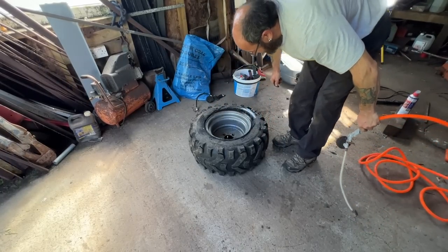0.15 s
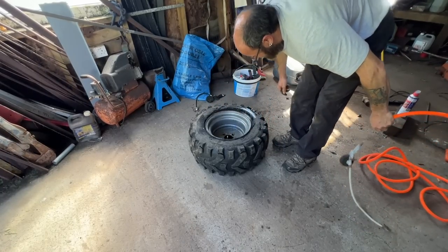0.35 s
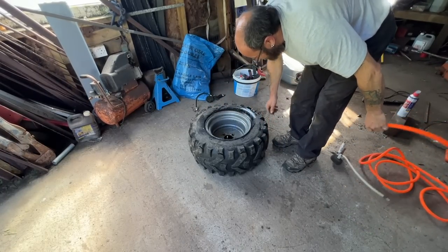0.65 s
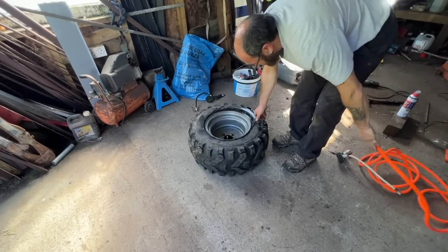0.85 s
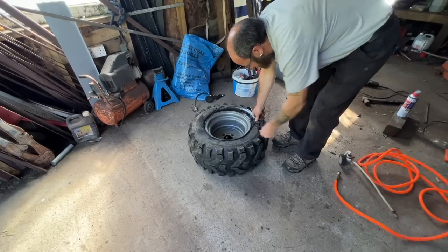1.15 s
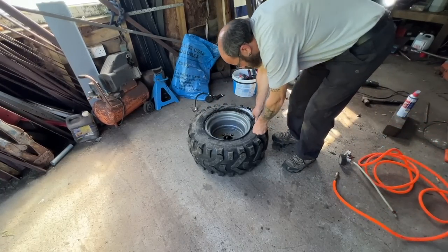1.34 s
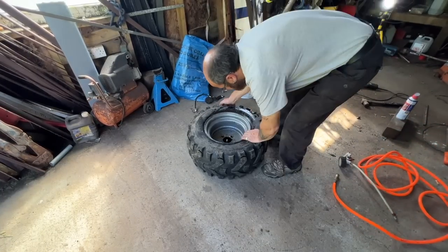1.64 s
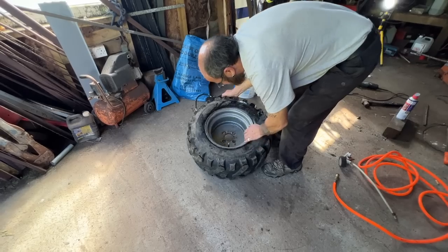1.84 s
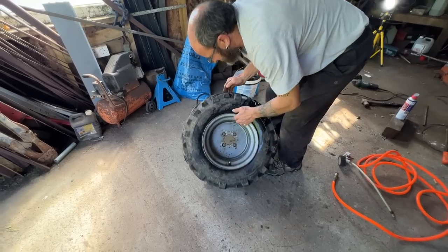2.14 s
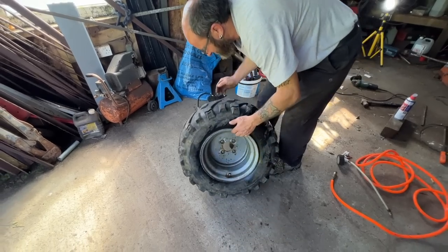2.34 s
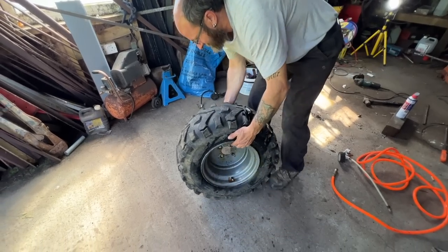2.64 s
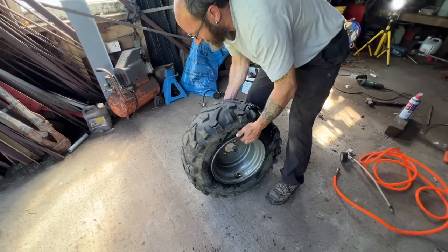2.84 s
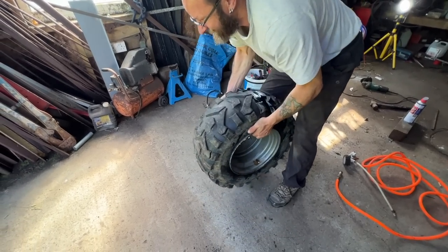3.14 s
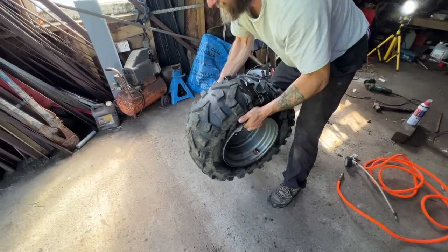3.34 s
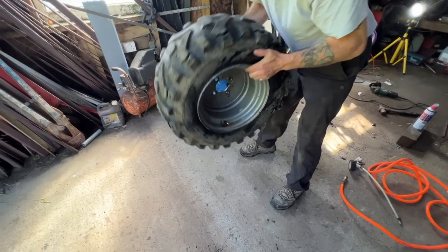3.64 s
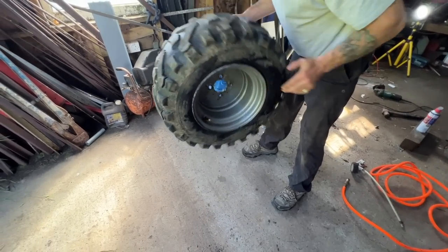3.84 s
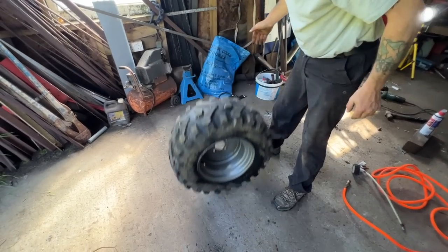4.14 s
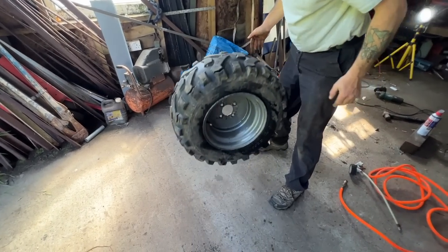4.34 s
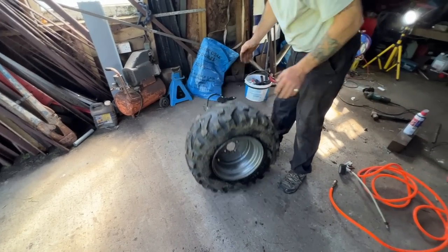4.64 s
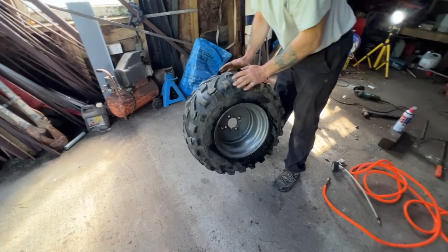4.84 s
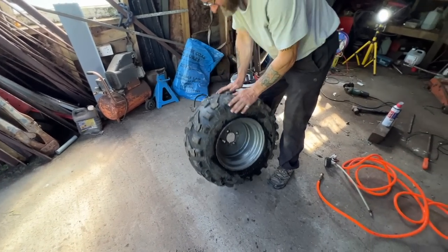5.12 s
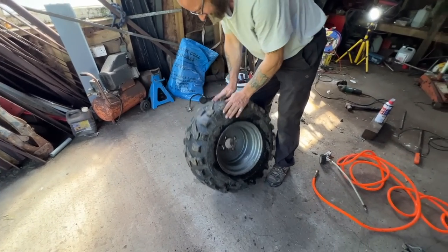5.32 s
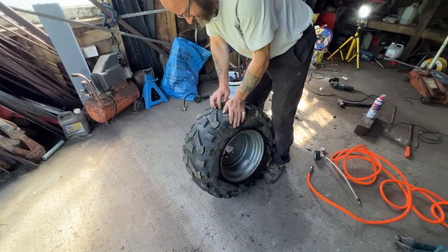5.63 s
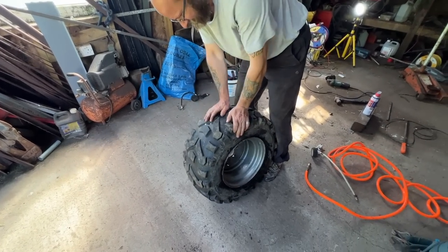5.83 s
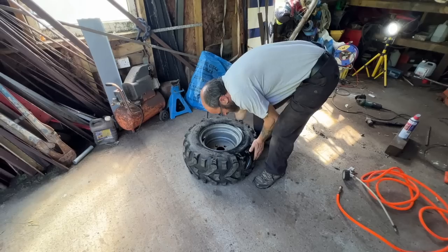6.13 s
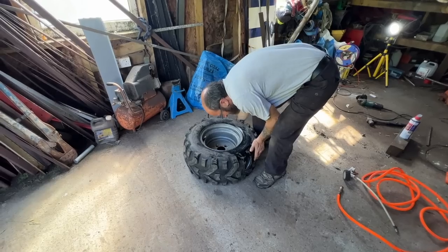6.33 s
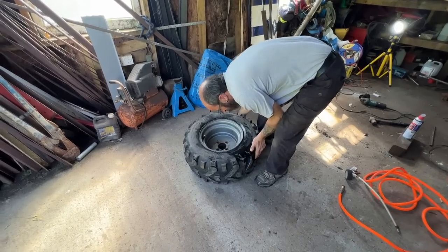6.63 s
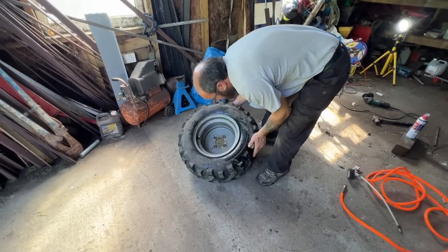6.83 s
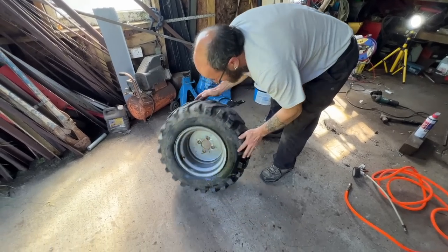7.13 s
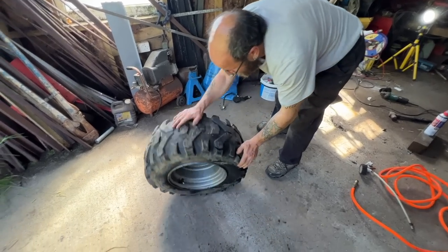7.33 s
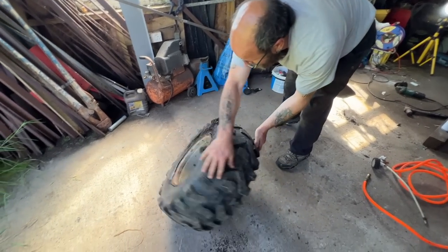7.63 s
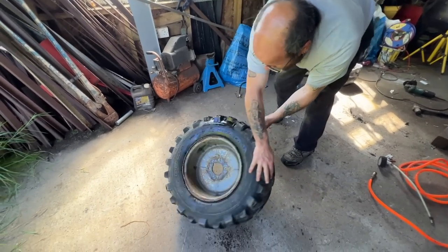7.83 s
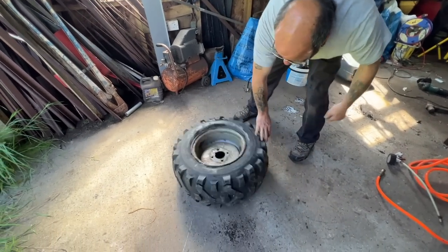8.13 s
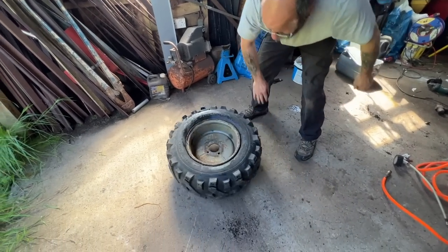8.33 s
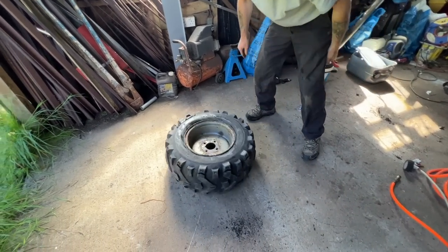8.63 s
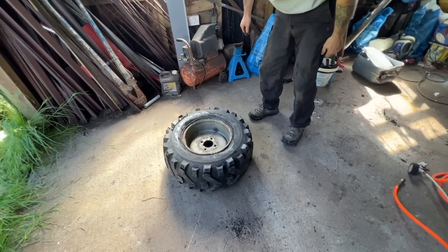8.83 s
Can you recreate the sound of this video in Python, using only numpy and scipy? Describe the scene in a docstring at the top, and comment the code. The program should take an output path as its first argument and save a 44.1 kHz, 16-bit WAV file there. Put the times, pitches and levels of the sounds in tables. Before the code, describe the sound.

Over a running compressor, a brief air hiss and metal clinks are followed by two runs of a tyre thumping on a concrete floor.

```python
"""Air hisses from an inflator chuck over the chug of a belt-driven piston compressor in a garage. The
compressor's valves hiss on every turn. At about 6.1 s the scene changes and the compressor is heard from
another spot, with a different balance of harmonics. The leak stops as the chuck and its hose drop on concrete,
close by and mostly louder on the left; then a tyre on a steel rim is lifted, bounced and tipped over. The
microphone has two ports; its gain control ducks the whole scene after each loud blow."""
import sys
import numpy as np
from scipy import signal
from scipy.io import wavfile
from scipy.ndimage import uniform_filter1d

SR = 44100
rng = np.random.default_rng(int(sys.argv[2]) if len(sys.argv) > 2 else 0)


def persist_wave(psi):
    """Save psi, clipped to +-1, as 16-bit WAV."""
    counts = np.round(np.clip(psi, -1, 1) * 32767).astype(np.int16)
    wavfile.write(sys.argv[1], SR, np.atleast_2d(counts).T)


N = 395566
T = np.arange(N) / SR

# Crank speed, sagging as the tank fills: t/s, speed/(turns/s)
CRANK_SPEED = [(0, 18.436), (1.6, 18.428), (4.5, 18.422), (6.1, 18.405), (9, 18.405)]
# Crank harmonics: order, left/dB, right/dB before 6.1 s, left/dB, right/dB after
CRANK_ORDERS = [(2, -51, -51, -52, -54), (3, -51, -50, -54, -53), (4, -35, -34, -36, -36),
                (5, -48, -52, -49, -49), (6, -33, -38, -34, -42), (7, -47, -45, -57, -48),
                (8, -25, -24, -25, -24), (9, -57, -63, -57, -61), (10, -47, -42, -48, -45),
                (11, -40, -38, -40, -40), (12, -45, -45, -52, -47), (13, -67, -57, -73, -65),
                (14, -44, -37, -42, -36), (15, -55, -70, -70, -72), (16, -41, -43, -43, -51),
                (17, -54, -58, -58, -56), (18, -49, -40, -49, -41), (19, -55, -54, -56, -50),
                (20, -45, -37, -48, -39), (21, -55, -66, -58, -50), (22, -43, -47, -49, -50),
                (23, -67, -46, -58, -51), (24, -47, -35, -43, -41), (25, -39, -38, -40, -41),
                (26, -45, -45, -46, -45), (27, -44, -39, -51, -39), (28, -43, -40, -44, -40),
                (29, -40, -40, -43, -42), (30, -47, -45, -44, -45), (31, -40, -40, -42, -38),
                (32, -45, -44, -42, -51), (33, -46, -55, -48, -65), (34, -48, -37, -50, -41),
                (35, -45, -54, -60, -68), (36, -49, -44, -46, -43), (37, -44, -32, -42, -31),
                (38, -50, -47, -40, -46), (39, -36, -34, -38, -37), (40, -36, -37, -37, -34),
                (41, -50, -39, -43, -46), (42, -46, -39, -48, -40), (43, -44, -46, -45, -44),
                (44, -47, -42, -56, -43), (45, -48, -46, -42, -36), (46, -41, -44, -46, -41),
                (47, -51, -51, -49, -51), (48, -51, -48, -47, -39), (49, -48, -45, -42, -41),
                (50, -50, -52, -49, -58), (51, -47, -42, -49, -45), (52, -45, -45, -46, -61),
                (53, -40, -43, -42, -40), (54, -46, -52, -47, -59), (55, -60, -54, -55, -50),
                (56, -55, -70, -60, -54), (57, -51, -56, -50, -59), (58, -56, -70, -53, -63),
                (59, -59, -54, -57, -72), (60, -63, -62, -58, -54), (61, -60, -54, -54, -61),
                (62, -55, -54, -48, -45), (63, -60, -67, -71, -61), (64, -54, -62, -68, -71),
                (65, -57, -51, -56, -52), (66, -55, -54, -54, -53), (67, -65, -51, -47, -47),
                (68, -68, -66, -53, -55), (69, -46, -44, -47, -51), (70, -58, -60, -51, -59),
                (71, -51, -54, -54, -56), (72, -60, -71, -56, -57), (73, -70, -57, -50, -50),
                (74, -62, -61, -63, -70), (75, -50, -44, -41, -47), (76, -55, -54, -64, -55),
                (77, -49, -56, -53, -64), (78, -60, -68, -68, -54), (79, -49, -66, -41, -51),
                (80, -56, -57, -55, -56), (81, -56, -60, -58, -52), (82, -54, -52, -58, -60),
                (83, -46, -68, -52, -68), (84, -61, -53, -62, -65), (85, -60, -57, -66, -63),
                (86, -60, -64, -66, -67), (87, -46, -58, -52, -50), (88, -52, -70, -66, -61),
                (89, -56, -58, -62, -55), (90, -54, -57, -58, -61), (91, -57, -56, -58, -57),
                (92, -59, -64, -62, -60), (93, -59, -58, -58, -54), (94, -56, -63, -60, -73),
                (95, -57, -51, -68, -65), (96, -57, -62, -64, -66)]
# How distinctly the valves knock: t/s, phase scatter removed/rad
KNOCK_CLARITY = [(0, 1.2), (1.5, 1.6), (3.9, 1.6), (4.3, .8), (5.9, .8), (6.2, 2.3), (7.4, 2.2), (8, 1),
                 (9, 1)]
# Thin whine, the crank's 107th harmonic: t/s, level/dB
CRANK_WHINE = [(0, -54), (.4, -46), (1.8, -47), (2.4, -51), (2.8, -56), (3.1, -50), (3.8, -50), (4, -62)]
# Motor shaft tones, beating with the crank: f/Hz, level/dB
MOTOR_TONES = [(80.5, -47), (99.7, -44), (136.5, -33.5), (154.9, -36), (170.8, -43), (173.4, -59)]
# Rattle between the orders: f/Hz, relative density/dB
RATTLE_SPECTRUM = [(15, -45), (25, -29), (60, -25), (100, 9), (150, -8), (220, -2.5), (320, -10), (480, -9),
                   (720, -6.5), (950, -10.5), (1060, -14.5), (1150, -10.5), (1400, -10.5), (1700, -13.5),
                   (2000, -19), (2600, -23), (4000, -85)]
# Valve hiss up to about 10 kHz; above it the noise is faint and uneven: f/Hz, relative density/dB
HISS_SPECTRUM = [(1060, 5.5), (1800, -1), (1950, 7), (2100, -1), (2300, 2.5), (3200, -7.5), (3470, -9.5),
                 (7440, -9.5), (8610, -3), (9100, -6.5), (9600, -9), (10000, -36), (11300, -18),
                 (12500, -102), (16200, -67.5), (22000, -120)]
# Valve plate resonances: f/Hz, width/Hz, level/dB
VALVE_WHISTLES = [(7950, 240, -58), (8250, 300, -57), (8530, 220, -50), (8880, 150, -57)]
# Swell of the compressor at the microphone: t/s, pump gain/dB, valve gain/dB
COMPRESSOR_GAINS = [(0, -1.5, 6.5), (.5, -3.5, 2), (1.002, -3.5, 2.5), (1.55, -2, 2), (1.68, -0.5, 2),
                    (2.5, -1, 3), (4, -1, 3.5), (5, 1.5, 3), (5.5, -2.5, 1.5), (6.05, -0.5, 2.5),
                    (6.15, 0.5, 2.5), (7.6, 0, 2.5), (8.2, 1, 7), (8.6, 2.5, 4.5), (9, 0.5, 5.5)]
# Tyre landings: t/s, level/dB, brightest f/Hz, spread/octaves, floor boom/dB, slap/dB,
# slap top f/Hz, rise/s, contact/s
TYRE_LANDINGS = [(4.094, 3, 453, 0.95, -10.5, -13.5, 1350, .005, 0.03),
                 (4.124, -3, 386, 1.34, -25, -17, 1300, .01, 0.022),
                 (4.6295, 4, 520, 1.28, -3.5, -17.5, 2050, 0.0004, 0.04),
                 (4.69, -23, 332, 1.5, -13.5, -32, 1900, .01, 0.032),
                 (5.04, 2.5, 427, 0.61, -14.5, -13, 1380, .001, 0.019),
                 (5.34, -10, 341, 1.17, -22.5, -24, 1390, 0.0018, 0.025),
                 (5.559, -19, 410, 0.65, -29, -47, 1410, .008, 0.017),
                 (5.716, -19, 415, 0.87, -33, -51, 1400, .008, 0.026),
                 (8.105, -3.5, 225, 1.04, -8.5, -18, 1210, .03, 0.062),
                 (8.39, -9, 278, 1, -26, -33, 1600, 0.011, 0.033),
                 (8.413, -9, 302, 1.2, -34, -12, 1300, .003, 0.013),
                 (8.433, 3.5, 215, 0.8, -20, -7.5, 1160, .015, 0.018),
                 (8.51, -15, 268, 0.7, -30, -39, 1800, .01, 0.026),
                 (8.654, 2.5, 215, 0.66, -18, -15.5, 1860, 0.004, 0.0095),
                 (8.8, -6.5, 523, 0.28, -49, -17, 1620, .002, 0.0068),
                 (8.809, 2.5, 196, .6, -15, -20, 1610, 0.004, 0.008),
                 (8.924, -6.5, 200, 0.89, -11.5, -22.5, 1600, 0.0049, 0.023)]
# Modes of the tyre on its rim: f/Hz, level/dB, t60/s
TYRE_MODES = [(100, -2, .2), (205, 1, .1), (245, -1, .16), (278, -3, .12), (330, -7, .08), (383, 1, .13),
              (456, 1, .11), (580, 0, .08), (670, -1, .06), (824, 0, .05), (970, 0, .05), (1180, -2, .04),
              (1380, -3, .04)]
# Chuck and gauge hitting the floor: t/s, level/dB, thud/dB, left minus right/dB, brightest f/Hz,
# relative ring/dB, rise/s, contact/s
CHUCK_HITS = [(0.277, -6, -5.5, 0, 2530, -10, .009, 0.013),
              (.419, -20.5, -13, 5, 1930, -3.5, 0.0055, 0.019),
              (0.5076, -24.5, -24, 0, 2080, -5, 0.0028, 0.012),
              (0.7655, -12, -34, 0, 2460, -16, .0005, .005), (.7745, -21, -31, 3, 2090, -8, .002, 0.012),
              (0.9802, -17.5, -28, 8, 7260, -4, 0.00088, 0.0032),
              (.989, -22, -45, 7, 7800, -1, 0.00055, 0.0035), (.998, -20, -43, 6, 8300, -7, .0005, .006),
              (1.0844, -5.5, -39, 9, 9300, -14, 0.000354, 0.0032),
              (1.094, -17, -45, 5, 7500, -18, .0008, .003), (1.098, -14, -42, 3, 7760, -12, 0.00056, 0.015),
              (1.392, -34, -49, 2, 8500, -8, 0.0011, .012)]
# Modes of the metal fittings: f/Hz, level/dB, t60/s
FITTING_MODES = [(1500, -6, .06), (1775, -9, .05), (1980, -1, .16), (2277, 0, .12), (2500, -5, .06),
                 (2950, -3, .06), (3515, -3, .045), (3811, 0, .06), (4350, -2, .045), (4800, -2, .045),
                 (5800, -6, .03), (6550, -6, .03), (7364, -2, .03), (8220, -1, .04), (8667, 0, .04)]
# Jet from the chuck: f/Hz, relative density/dB
JET_SPECTRUM = [(700, -33), (1300, 13.5), (2400, 0), (5000, -0.5), (8600, 0), (11500, -3.5), (16000, -6.5)]
# Drags on concrete, mostly rubber and hose; the short one at 3.19 s is a light metal clink: t/s, length/s,
# level/dB, resonance f/Hz
DRAGS = [(2.619, 0.057, -42, 3130), (3.19, 0.031, -36.5, 5940), (3.24, 0.05, -41.5, 3600),
         (4.468, 0.12, -30.5, 2230), (8.316, 0.025, -32.5, 2880), (8.847, 0.029, -29, 5100)]
# Decay of the garage: f/Hz, t60/s
GARAGE_DECAY = [(100, 0.29), (250, 0.22), (500, 0.13), (1500, 0.24), (5000, 0.25), (12000, 0.19)]
# Likeness of the two microphone ports, their lag aside: f/Hz, coherence (0 to 1)
PORT_COHERENCE = [(60, .97), (150, .97), (300, .65), (700, .45), (1500, .5), (4000, .45), (9000, .55),
                  (13000, .8)]
# Balance of noise between the ports: f/Hz, left minus right/dB
PORT_BALANCE = [(60, -2), (130, 4), (290, -4), (640, -0.5), (1410, 0.5), (3100, 1.5), (6820, 15),
                (15000, -18.5)]

LEFT_LAG_S, TOP_HZ = 0.0002503, 16100  # delay to the left port; upper band edge
TONE_CHANGE_S = 6.04, 6.12  # a short crossfade as the scene changes at about 6.1 s


def compressor():
    """The running machine: crank, motor and rattle below, hissing and whistling valves above."""
    turns = np.cumsum(np.interp(T, *np.transpose(CRANK_SPEED))) / SR
    turns -= turns[round(6.4295 * SR)]  # count from one valve knock
    tones = crank(turns) + hum_and_whine(turns)
    whistle = valve_whistle(turns)
    pump = tones + amp(-32) * port_noise(RATTLE_SPECTRUM, patchy_db=1.5)
    valves = whistle + amp(-38) * port_noise(HISS_SPECTRUM, patchy_db=2)
    times, pump_db, valve_db = np.transpose(COMPRESSOR_GAINS)
    return amp(np.interp(T, times, pump_db)) * pump + amp(np.interp(T, times, valve_db)) * valves


def crank(turns):
    """The piston sounds harmonics of the crank speed; those near 700 Hz line up into the valve knock."""
    step, out = 8, 0  # all under 2 kHz, so an eighth of the rate will do
    t, knots = T[::step], np.arange(0, 10, .35)
    changed = np.interp(t, TONE_CHANGE_S, (0, 1))
    clarity = np.interp(t, *np.transpose(KNOCK_CLARITY))
    for (order, *levels_db), lag in zip(CRANK_ORDERS, crank_lags()):
        before_db, after_db = np.reshape(levels_db, (2, 2, 1))
        knock = np.exp(-((order - 40) / 8) ** 4)
        scatter = (np.pi - clarity * knock) * rng.uniform(-1.033, 1)
        phase = 2 * np.pi * order * turns[::step] + scatter + np.array([[-lag / 2], [lag / 2]])
        waver = np.array([np.interp(t, knots, port) for port in rng.standard_normal((len(knots), 2)).T])
        depth_db = np.clip(order / 20, .5, 1.6)  # people moving about shift the short waves most
        knock_shift = np.exp(-2j * np.pi * order * .19)  # before 6.1 s the knock falls .19 turn later
        at_mic = (1 - changed) * amp(before_db) * knock_shift + changed * amp(after_db)
        out += np.sqrt(2) * amp(depth_db * waver) * (at_mic * np.exp(1j * phase)).real
    return signal.resample_poly(out, step, 1, axis=1)[:, :N]


def crank_lags():
    """Left-port lag per order in radians: echoes scatter it above 240 Hz, less so for strong orders."""
    rows = np.array(CRANK_ORDERS, float)
    order, loudest_db = rows[:, 0], rows[:, 1:].max(1)
    hz = order * CRANK_SPEED[0][1]
    direct = np.clip((loudest_db + order / 8 + 43) / 14, 0, .7)
    scatter = (1 - direct) * 1.33 / (1 + (240 / hz) ** 4)
    return 2 * np.pi * hz * LEFT_LAG_S + scatter * rng.standard_normal(len(hz))


def hum_and_whine(turns, whine_hz=1971):
    """The motor shaft's hum and the crank's thin whine, both sagging with the crank speed."""
    shaft_s = turns / 18.42  # time as the slowing shaft counts it
    hum = sum(amp(db) * np.cos(2 * np.pi * (hz * shaft_s + rng.random())) for hz, db in MOTOR_TONES)
    whine = amp(np.interp(T, *np.transpose(CRANK_WHINE))) * np.cos(2 * np.pi * whine_hz * shaft_s)
    return np.sqrt(2) * (hum + whine)


def valve_whistle(turns, repeating=.75):
    """Air rings the valve plates and puffs once a turn; part of the clatter repeats on every turn."""
    puff_turn = .52 + .1 * np.interp(T, TONE_CHANGE_S, (1, 0))
    puff = 1 + .45 * np.exp(2.5 * (np.cos(2 * np.pi * (turns - puff_turn)) - 1))
    one_turn = signal.resample(rng.standard_normal((2, 2400)), 19200, axis=1)
    clatter = one_turn[:, (turns % 1 * one_turn.shape[1]).astype(int)]
    air = repeating * clatter + np.sqrt(1 - repeating ** 2) * rng.standard_normal((2, N))
    return puff * sum(amp(db) * unit_rms(band(air, hz - width / 2, hz + width / 2, order=2))
                      for hz, width, db in VALVE_WHISTLES)


def tyre_bounces():
    """Each landing rings the tyre; the carcass shudders, the tread slaps and the floor booms."""
    out = np.zeros(N)
    for start, db, hz, octaves, boom_db, slap_db, top_hz, rise, contact in TYRE_LANDINGS:
        modes = [(f, level - 10 * (np.log2(f / hz) / octaves) ** 2, t60) for f, level, t60 in TYRE_MODES]
        # soft rubber: the lower the thump, the longer the blow; a slow landing softens it
        force = chatter(rise, contact, blow=36.5 * np.exp(-rise / .022), blow_s=.12 / hz)
        shudder = band(chatter(rise, .94 * contact), hz / 2 ** (.8 * octaves), hz * 2 ** (1.05 * octaves))
        tread_force = chatter(rise, 1.45 * contact, blow=26 * np.exp(-rise / .0072))
        slap = band(tread_force, 450, top_hz) + .2 * band(chatter(rise, contact), top_hz, 7400)
        add(out, start - rise, amp(db) * (.61 * ring(modes, force) + .48 * shudder) + amp(slap_db) * slap)
        add(out, start, amp(boom_db) * floor_boom(len(force)))
    return out


def chuck_clinks():
    """Fittings ring over a bright crack and the gauge's thud; a glancing hit has no sharp edge."""
    out = np.zeros((2, N))
    for start, db, thud_db, side_db, hz, ring_db, rise, contact in CHUCK_HITS:
        force = chatter(rise, contact, blow=32.5 * np.exp(-rise / .002), blow_s=.00005)
        modes = [(f * (1 + .015 * rng.standard_normal()),
                  level - 20 * np.log2(f / hz) ** 2 + 2.5 * rng.standard_normal(), t60)
                 for f, level, t60 in FITTING_MODES]
        crack = 1.06 * band(force, hz / 2.73, 7200) + .82 * band(force, hz / 1.71, hz * 1.28)
        metal = amp(ring_db) * ring(modes, force) + crack + amp(-11) * band(force, 9100, TOP_HZ)
        gauge_force = chatter(rise + .006, contact=.024, blow=19, blow_s=.00072)
        thud = band(gauge_force, 107, 470) + amp(-10) * floor_boom(len(force))
        pan = amp(side_db * np.array([[.5], [-.5]]))
        add(out, start - rise, (amp(db) * metal + amp(thud_db) * thud) * pan)
    return out


def chuck_leak(stop_s=.418):
    """A broad air jet spurts, settles and cuts off when the chuck lands."""
    t, out = T[:SR // 2], np.zeros((2, N))
    level_db = -32.5 + 12 * np.exp(-t / .047)
    add(out, 0, amp(level_db) * (t < stop_s) * port_noise(JET_SPECTRUM, patchy_db=0, size=len(t)))
    return out


def floor_scuffs():
    """Drags and scrapes on concrete: grit through a resonance over a broad scrape, loudest mid-event."""
    out = np.zeros(N)
    for start, length, db, hz in DRAGS:
        t = np.arange(0, length, 1 / SR)
        grit = rng.standard_normal(len(t)) * amp(3.3 * rng.standard_normal(len(t)))
        rub = unit_rms(resonate(resonate(grit, hz, .4 * hz), hz, .4 * hz))
        scrape = unit_rms(band(band(grit, 830, 6000), 500, 7000))
        fade_db = -20 * abs(np.interp(t / length, (0, .49, 1), (-1, 0, 1))) ** 1.12
        add(out, start, amp(db + fade_db) * (rub + .3 * scrape))
    return out


def floor_boom(size):
    """The floor slab heaves under a blow at two low pitches."""
    t = np.arange(size) / SR
    slab = np.sin(2 * np.pi * 92 * t) + .11 * np.sin(2 * np.pi * 36 * t)
    return slab * (t / .034) * np.exp(1 - t / .019)


def garage_echoes(x):
    """Sparse echoes, each band dying at its own speed; long waves reach both ports alike."""
    taps = np.zeros((2, SR // 2))
    arrivals = np.arange(300, SR // 2 - 20, 20) + rng.integers(0, 20, (2, (SR // 2 - 301) // 20))
    np.put_along_axis(taps, arrivals, rng.choice([-1., 1.], arrivals.shape), 1)
    hz, t, (apart, right) = signal.stft(taps, SR, nperseg=512)
    spectra = np.array([cohere(right, apart, hz), right]) * amp(-60 * t / lookup(GARAGE_DECAY, hz))
    tail = signal.istft(spectra, SR, nperseg=512)[1]
    return signal.fftconvolve(x[None], tail / np.linalg.norm(tail[0]), axes=1)[:, :N]


def port_noise(spectrum, patchy_db, size=N):
    """Coloured noise with drifting patches, as the two ports hear it, at rms 1."""
    frames, hz = size // 256 + 5, np.fft.rfftfreq(1024, 1 / SR)
    right_re, right_im, apart_re, apart_im, patches = rng.standard_normal((frames, 513, 5)).T
    patches = unit_rms(uniform_filter1d(uniform_filter1d(patches, 9, 0), 12, 1))
    right = right_re + 1j * right_im
    left = cohere(right, apart_re + 1j * apart_im, hz) * np.exp(-2j * np.pi * hz * LEFT_LAG_S)[:, None]
    pan = amp(lookup(PORT_BALANCE, hz) / 2)
    spectra = np.array([left * pan, right / pan]) * amp(lookup(spectrum, hz) + patchy_db * patches)
    return unit_rms(signal.istft(spectra, nperseg=1024, noverlap=768)[1][:, :size])


def cohere(right, apart, hz):
    """The left port's spectrum: partly the right port's, partly independent."""
    coherence = lookup(PORT_COHERENCE, hz)
    return coherence * right + np.sqrt(1 - coherence ** 2) * apart


def chatter(rise, contact, blow=0., blow_s=.0001):
    """Rough contact force: noise swells for rise and dies over contact seconds, a blow at its peak."""
    t = np.arange(round(.25 * SR)) / SR
    since_peak = np.maximum(t - rise, 0)
    rough = np.minimum(t / rise, 1) ** 2 * np.exp(-since_peak / contact) * rng.standard_normal(len(t))
    age = since_peak / blow_s
    return rough + blow / (blow_s * SR) * age * np.exp(-age)


def ring(modes, force):
    """A force rings a set of damped modes, at peak 1."""
    t = np.arange(round(.3 * SR)) / SR
    body = sum(amp(db - 60 * t / t60) * np.sin(2 * np.pi * hz * t) for hz, db, t60 in modes)
    out = signal.fftconvolve(force, body)
    return out[:len(force)] / abs(out).max()


def resonate(x, hz, width_hz):
    """One resonance: shifts hz down to zero, smooths, and shifts back."""
    carrier = np.exp(2j * np.pi * hz * np.arange(len(x)) / SR)
    pole = np.exp(-np.pi * width_hz / SR)
    return 2 * (carrier * signal.lfilter([1 - pole], [1, -pole], x / carrier)).real


def band(x, low_hz, high_hz, order=3):
    """Band-pass scaled to peak 1."""
    out = signal.sosfilt(signal.butter(order, [low_hz, high_hz], "bandpass", fs=SR, output="sos"), x)
    return out / abs(out).max()


def lookup(table, hz):
    """A table's values on a log-frequency axis, as a column."""
    f, value = np.transpose(table)
    return np.interp(np.log(hz + 1), np.log(f + 1), value)[:, None]


def add(mix, start_s, sound):
    """Mixes a sound in at a time."""
    part = mix[..., round(start_s * SR):][..., :sound.shape[-1]]
    part += sound[..., :part.shape[-1]]


def amp(db):
    """Gain of a level in dB."""
    return 10 ** (np.asarray(db) / 20)


def unit_rms(x):
    """Scales to rms 1."""
    return x / np.sqrt(np.mean(x ** 2) + 1e-20)


def scene():
    """Close blows and their echoes over the compressor; the clinks reach the left a fraction later."""
    metal, rubber = chuck_clinks(), tyre_bounces() + floor_scuffs()
    metal_at_mic = np.array([np.roll(metal[0], round(LEFT_LAG_S * SR)), metal[1]])
    return metal_at_mic + rubber + garage_echoes(metal.mean(0) + rubber) + chuck_leak() + compressor()


def record(dry):
    """The microphone's gain control ducks after loud blows and recovers; soft ceiling; band limit."""
    threshold_db, recovery_db_per_s = -18.5, 20
    power_db = 10 * np.log10(abs(uniform_filter1d((dry ** 2).mean(0), 1500, origin=700)) + 1e-12)
    recovery_db = T * recovery_db_per_s
    held_db = np.maximum.accumulate(power_db + recovery_db) - recovery_db
    over_db = np.maximum(held_db - threshold_db, 0)
    ducked = dry / amp(.64 * uniform_filter1d(over_db, 900, origin=440))
    limited = 1.083 * np.tanh(ducked / 1.126)
    lowpass = signal.firwin(511, TOP_HZ, window=("kaiser", 9), fs=SR)
    return signal.oaconvolve(limited, lowpass[None], "same")


dry = scene()
out = record(dry)
persist_wave(out)
```